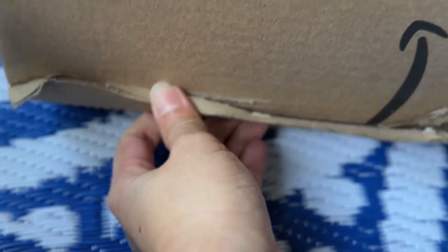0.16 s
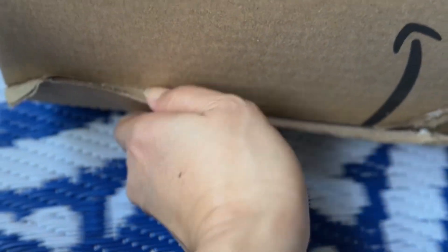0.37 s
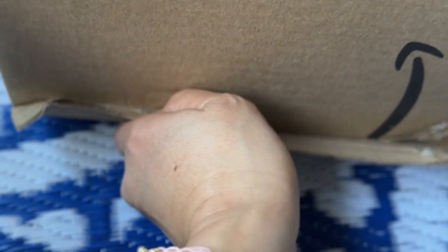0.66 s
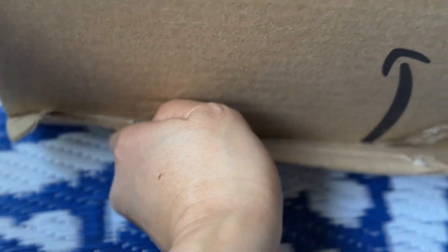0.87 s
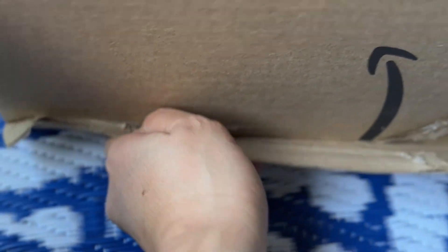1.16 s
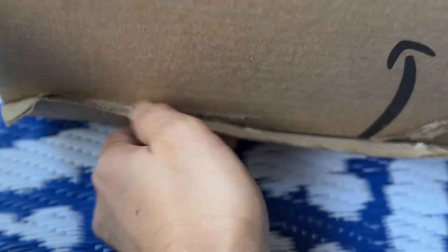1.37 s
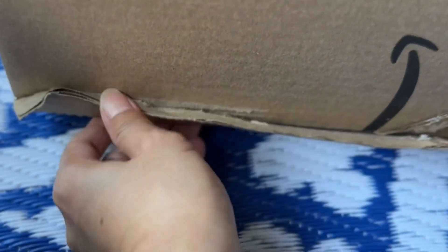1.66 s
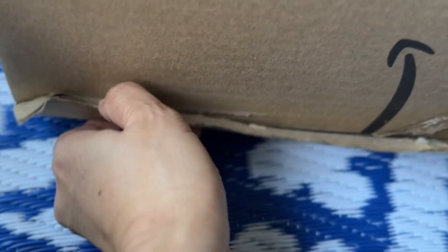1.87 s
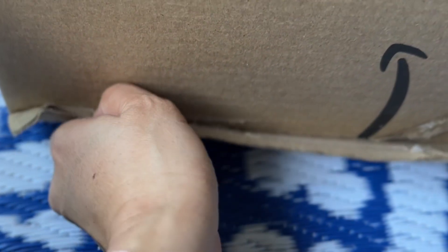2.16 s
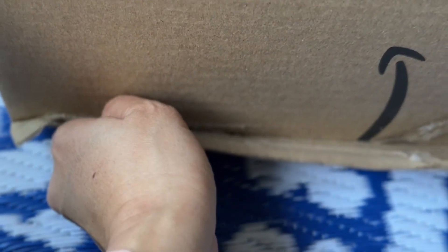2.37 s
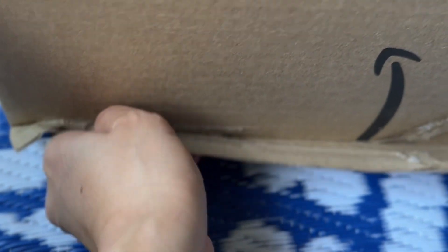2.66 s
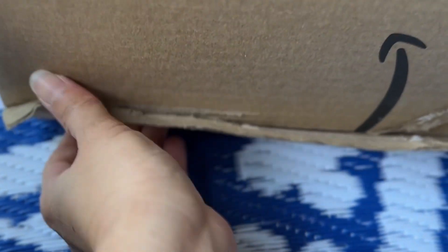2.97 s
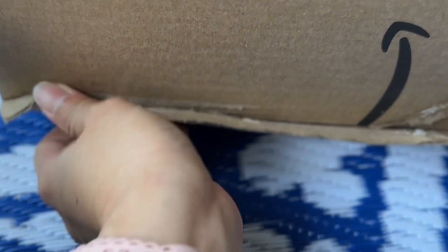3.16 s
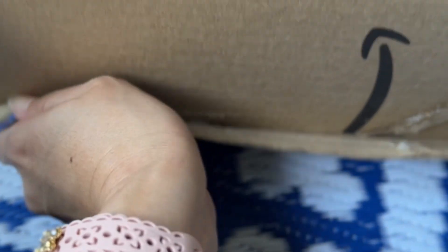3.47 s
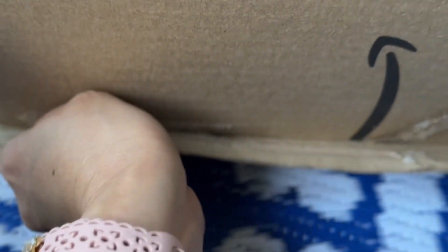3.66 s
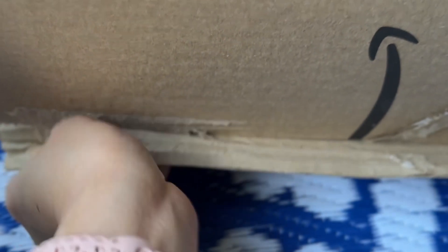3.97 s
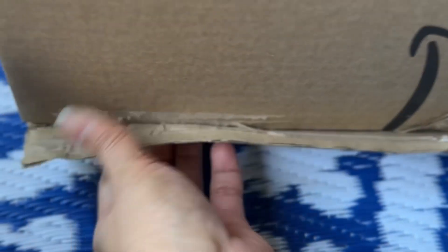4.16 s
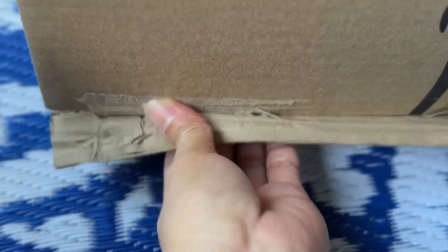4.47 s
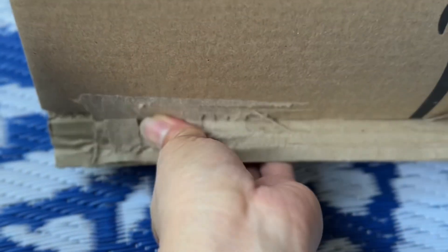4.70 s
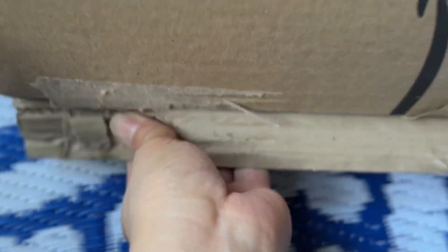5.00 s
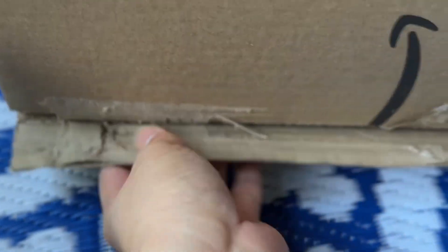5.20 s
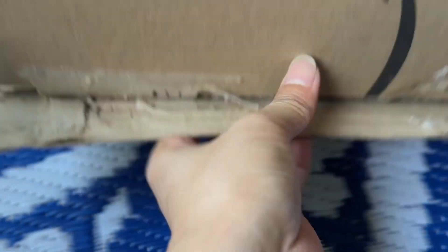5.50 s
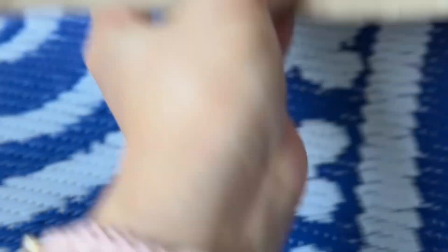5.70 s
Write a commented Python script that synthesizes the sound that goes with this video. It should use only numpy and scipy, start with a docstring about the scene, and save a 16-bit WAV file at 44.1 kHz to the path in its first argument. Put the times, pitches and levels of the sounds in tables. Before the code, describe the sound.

Very close to the microphone in a small room, fingers pick at a cardboard box seam. Soft scratching and dull flap knocks come first, then a hard hollow pop near two seconds. Dry ticks and crackling follow, building to sharp tearing snaps around three and a half and nearly five seconds, then lighter rubbing over faint hiss.

```python
"""Fingers pick at the taped seam of a cardboard box in a small room, close to the microphone.
Tape lets go in sharp snaps and fibres tick: bursts of noise, coloured by the board and the seam.
A nail rasps along the edge: random stick-slip clicks, filtered as hiss or ringing narrow patches.
The flap flexes with hollow knocks and groans: swinging sines. Knocks and rubbing ring the same box modes.
Low shoves of the hand, a hum of the box, a short room tail and a low rumble with faint hiss lie beneath."""
import sys
import numpy as np
from scipy import signal
from scipy.fft import rfft, irfft, next_fast_len
from scipy.io import wavfile

SR = 44100
rng = np.random.default_rng(int(sys.argv[2]) if len(sys.argv) > 2 else 0)


def to_wav(s):
    """Save 16-bit WAV."""
    ch = np.atleast_2d(s).T  # columns
    pcm = np.round(np.clip(ch, -1, 1) * 32767)  # PCM
    wavfile.write(sys.argv[1], SR, pcm.astype(np.int16))


N = 257544

# Flexes of the flap. Each row: start in seconds, level in dB, pitch in Hz before the sag of hard pops,
# boom of the whole box and rattle of the wall, both in dB relative to the level before the trims.
KNOCKS = [(0.127, -30.5, 350, -4, -12), (0.1833, -24, 361, 2, -9.5), (0.2204, -23.5, 340, -29, -11.5),
          (0.2332, -24, 336, -17, -8), (0.245, -38, 340, -10, 2), (0.291, -35.5, 403, 8, 3),
          (0.4401, -19.5, 259, 4, -19), (0.47, -29.5, 340, 7, -34), (0.863, -42, 303, 4, -12),
          (1.207, -28.5, 279, 6, -9.5), (1.263, -26, 303, -10, -11), (1.293, -28.5, 200, 6, -16),
          (1.612, -37, 350, 2, -1), (1.703, -35, 252, 0, -2.5), (1.731, -35, 366, -8, -7),
          (1.8563, -3, 369, -28, -20), (2.259, -19, 318, -2, -19), (2.271, -28, 288, -4, -31),
          (2.694, -33.5, 208, -27, -10), (3.086, -28, 363, -8, -12.5), (3.155, -35.5, 400, 5, -2.5),
          (3.2073, -24, 314, -5, -0.5), (3.225, -25, 337, -19, 0), (3.246, -27.5, 314, -12, 2),
          (3.2705, -25, 335, 3, -8), (3.297, -33, 207, 11, -2.5), (3.366, -44.5, 410, 4, 7.5),
          (3.481, -14.5, 291, -4, -15), (3.494, -23, 260, 0, -27), (3.578, -21.5, 270, -25, -14),
          (3.727, -28, 258, -5, -14), (3.963, -23, 336, 7, -2), (4.189, -29, 210, -6, -26),
          (4.198, -38, 304, -8, -24), (4.306, -35, 236.6, -1, -7), (4.521, -28, 314, -9, -7),
          (4.563, -33, 250, 9, -6), (4.613, -37, 401, 0, -3), (4.757, -13, 370, 5, -11),
          (4.769, -16, 352, 4.5, -10), (4.79, -26, 200, 3, -11), (5.297, -38.5, 400, -8, -18),
          (5.37, -31.5, 435, -26, -11), (5.456, -32, 403, -10, -7), (5.492, -34, 358, -8, -10),
          (5.753, -28.5, 335, -5, -31), (5.829, -26.5, 345, -8, -4)]
# Tape and board snapping. Each row: break in seconds, level in dB, pitch in Hz, t60 in seconds,
# level an octave above the pitch in dB.
SNAPS = [(1.002, -32.5, 955, 0.014, -15), (1.28, -29.5, 940, 0.015, -9), (1.8554, -13, 760, 0.011, -17),
         (3.0876, -30, 700, 0.01, -17), (3.2077, -21, 1070, 0.016, -16), (3.2249, -24, 1090, 0.012, -9),
         (3.245, -18.5, 1080, 0.0087, -13.5), (3.2702, -24.5, 1090, 0.011, -12),
         (3.5757, -4, 1170, 0.016, -6), (3.864, -33, 1470, 0.019, -28), (3.964, -25.5, 1010, 0.019, 8),
         (4.136, -31, 910, 0.021, 3), (4.565, -26, 1050, 0.027, -9), (4.613, -30, 3360, 0.029, -19),
         (4.7577, -3, 2360, 0.013, -11), (5.028, -20, 2830, 0.011, -13), (5.576, -19, 1490, 0.015, -8),
         (5.563, -38, 1800, 0.014, -7), (5.603, -33, 1600, 0.014, -9), (5.616, -31, 1090, 0.021, -1),
         (5.815, -32, 1250, 0.018, -8), (5.83, -29, 1250, 0.022, -8)]
# Strokes of the nail along the seam, sizzling on slick tape and dull on bare board. Each row: start,
# length and rise in seconds, hiss level in dB, lift of the treble in dB.
STROKES = [(0.0, 0.33, 0.022, -44.5, -5), (0.51, 0.045, 0.011, -51.5, 6.5), (0.59, 0.23, 0.02, -45.5, 2.5),
           (0.792, 0.4, 0.075, -41.5, -4.5), (1.164, 0.14, 0.029, -44.5, -15),
           (1.353, 0.092, 0.033, -44, -8), (1.683, 0.026, 0.024, -45, 6), (2.193, 0.12, 0.087, -39, 2.5),
           (2.332, 0.02, 0.0046, -40, 11), (2.36, 0.035, 0.011, -43.5, 7.5), (2.436, 0.13, 0.019, -40, 4),
           (2.686, 0.047, 0.012, -38.5, -1), (2.987, 0.018, 0.015, -43, 2), (3.082, 0.012, .01, -42, -5),
           (3.478, 0.051, .005, -37.5, 0), (3.574, 0.046, 0.0037, -28, 3), (3.652, 0.25, 0.072, -33.5, 3.5),
           (3.951, 0.12, 0.015, -38, -16), (4.202, 0.2, 0.011, -48, 3.5), (4.405, 0.13, 0.054, -40.5, 9),
           (4.497, 0.044, 0.015, -30, 9), (4.562, 0.034, .01, -35.5, 7), (4.612, 0.021, 0.0054, -36.5, 8.5),
           (4.661, 0.047, .005, -40.5, 16), (4.697, 0.064, 0.062, -23.5, 2), (4.78, 0.1, 0.017, -39.5, 7.5),
           (5.289, 0.62, 0.036, -37.5, -2), (5.517, 0.75, 0.034, -39.5, -4)]
# Modes of the box. Each row: frequency in Hz, level in dB, t60 in seconds.
BOX = [(57.7, -7, 0.083), (105, 1.5, 0.048), (136.3, 1, 0.11), (201.6, -5.5, 0.094), (291.7, -5.5, 0.043),
       (348.8, -3.5, 0.048), (478, -7, 0.027), (581, -2.5, 0.03), (984, -4, 0.01), (1122, -4.5, 0.024),
       (1256, -8.5, 0.019), (1770, -8.5, 0.015), (2075, -9.5, 0.017), (2690, -11, 0.0085)]
# Stereo width. Each row: frequency in Hz, side relative to mid in dB.
WIDTH = [(60, -16), (200, -16), (380, -18.5), (650, -1), (1200, -4.5), (2400, 3), (16000, -8)]
TICK_T60_S = 0.01   # neighbouring fibres follow a catch or a crack in a rip for this long


def amp(db):
    """Decibels to gain."""
    return 10 ** (np.asarray(db) / 20)


def rms_one(x):
    """Scale to unit rms."""
    return x / np.sqrt(np.mean(x ** 2) + 1e-20)


def at_hz(points, hz):
    """Read a curve of (Hz, value) points on a log-frequency axis."""
    f, values = np.transpose(points)
    return np.interp(np.log(np.maximum(hz, 1)), np.log(f), values)


def fade(t, t60):
    """Exponential decay, 60 dB down after t60 seconds."""
    return np.exp(-np.log(1000) * t / max(t60, 1e-3))


def add(track, s, sound):
    """Mix a sound in at time s, cut off at the end of the track."""
    i = min(max(round(s * SR), 0), N)
    track[..., i:i + sound.shape[-1]] += sound[..., :N - i]


def colour(x, spectrum):
    """Causal (minimum-phase) filter with the given spectrum, folded from its real cepstrum."""
    size = 2 * next_fast_len(x.shape[-1] // 2 + 2048)
    gains = amp(at_hz(spectrum, np.fft.rfftfreq(size, 1 / SR)))
    cepstrum = irfft(np.log(gains))
    cepstrum[1:size // 2] *= 2
    cepstrum[size // 2 + 1:] = 0
    response = np.exp(rfft(cepstrum))
    return irfft(rfft(x, size) * response)[..., :x.shape[-1]]


def drift(rate):
    """Smooth chance: straight lines between normal random knots, rate knots per second."""
    knots = rng.standard_normal(N // 40)
    return np.interp(np.arange(N) / SR * rate, np.arange(len(knots)), knots)


def fracture(t, lead_s, build_db, build_t60):
    """Fibres give way faster and faster until the break at lead_s."""
    return (t < lead_s) * amp(build_db) * fade(np.abs(lead_s - t), build_t60)


def effort(length_s, rise_s, ease_db_per_s, release_t60):
    """Pressure builds, eases off slowly while the movement lasts, then dies away."""
    t = np.arange(SR) / SR
    rise = np.minimum(t / max(rise_s, 1e-3), 1)
    return rise * amp(-ease_db_per_s * t) * fade(np.maximum(t - length_s, 0), release_t60)


def delayed(x, count):
    """Later by count samples."""
    return np.pad(x, (count, 0))[:len(x)]


def left_right(mid, side):
    """Mid and side to two channels."""
    return np.array([mid + side, mid - side])


def diffuse(size):
    """Noise from all round: nearly alike left and right in the bass, less so in the treble."""
    mid, side = rng.standard_normal((2, size))
    return left_right(mid, colour(side, WIDTH))


def from_seam(mid, side, bounce=0.013):
    """Sound from the seam bounces once in the gap under the flap and reaches the left port a little later."""
    # Each row: frequency in Hz, side relative to mid in dB.
    seam_width = [(2000, -4), (4500, 0.5), (8000, -5.5), (16000, -54)]
    # Each row: frequency in Hz, left minus right in dB.
    seam_balance = [(2200, 0), (4000, -2.5), (6000, 4), (9000, -0.5), (16000, 2)]
    # Each row: frequency in Hz, lag of the left port in radians.
    port_phase = [(400, 0), (3700, 3.1), (7000, 4.9), (8000, 6.3), (8700, 6.4), (10400, 9.35), (11900, 9.5),
                  (13700, 12.5), (15000, 12.6), (16000, 14)]
    bounce_s = 0.001
    channels = left_right(mid, colour(side, seam_width))
    left, right = (x - bounce * delayed(x, round(bounce_s * SR)) for x in channels)
    size = 2 * next_fast_len(N // 2 + 2048)
    lag = at_hz(port_phase, np.fft.rfftfreq(size, 1 / SR))
    left = irfft(rfft(left, size) * np.exp(-1j * lag))[:N]
    left = colour(left, [(hz, db / 2) for hz, db in seam_balance])
    right = colour(right, [(hz, -db / 2) for hz, db in seam_balance])
    return np.array([left, right])


def slips(per_s, spread_db, clump_db, clump_rate):
    """Stick-slip: two rows of random clicks of uneven size that come in clumps."""
    born = rng.random((2, N)) < per_s / SR
    sizes = amp(spread_db * np.clip(rng.standard_normal((2, N)), -2, 2))
    signs = rng.choice([-1, 1], (2, N))
    clumps = amp(clump_db * np.clip(drift(clump_rate), -2, 2))
    return rms_one(born * sizes * signs * clumps)


def sliding_ring(drive, hz, t60):
    """A resonance whose pitch wanders as the finger moves and bends the board."""
    detune, detunes_per_s = 0.03, 14
    pitch = hz * (1 + detune * drift(detunes_per_s)[:drive.shape[-1]])
    turn = np.exp(2j * np.pi * np.cumsum(pitch) / SR)
    # shift the drive down to 0 Hz, let it decay there, shift it back up
    # the tiny offset keeps the filter off exact zero
    ring = signal.lfilter([1], [1, -fade(1 / SR, t60)], drive * np.conj(turn) + 1e-18)
    return np.imag(turn * ring)


def background(level_db=-53.0):
    """Low rumble of the room under a faint steady hiss: coloured noise."""
    # Each row: frequency in Hz, gain in dB.
    air = [(20, -2.5), (60, 10), (130, -6.5), (250, 1.5), (500, -13.5), (1000, -16.5), (2300, -23.5),
           (3300, -6.5), (4500, -7), (7000, -14.5), (10000, -63), (16000, -69)]
    return amp(level_db) * rms_one(colour(diffuse(N), air))


def room(x, t60=0.2, wet_db=-18.5, first_s=0.0066):
    """A short, soft tail from the walls: the sound convolved with decaying noise."""
    t = np.arange(SR // 2) / SR
    tail = diffuse(len(t)) * fade(t, t60) * (t > first_s)
    tail = tail / np.sqrt(np.sum(tail ** 2) / 2)
    tail = colour(tail, [(400, 6.5), (1500, 7.0), (8000, 2.0)])
    return amp(wet_db) * signal.fftconvolve(x, tail, axes=-1)[:, :N]


def box_drive():
    """Strength of sway, drone and rasp: the hand rests and drags, and every knock or snap leaves a shudder."""
    # Drags of the hand, and a brief shudder of the box after a knock. Each row: start, length and rise
    # in seconds, then sway of the box, drone of the flap and rasp of the wall, each in dB.
    drags_and_shudder = [(0.0, 0.29, 0.005, -54, -51, -58), (0.18, 0.17, 0.087, -49, -46.5, -55),
                         (0.436, 0.015, 0.0051, -31, -34, -49), (0.847, 0.48, 0.017, -68, -48, -60.5),
                         (0.983, 0.11, 0.068, -41, -48, -50), (1.244, 0.054, .018, -32, -36.5, -44.5),
                         (1.343, 0.098, 0.013, -45, -43.5, -53), (1.569, 0.049, 0.02, -46.5, -46, -52),
                         (1.668, 0.05, 0.015, -41.5, -35.5, -51), (2.283, 0.11, .02, -68, -55.5, -59),
                         (2.455, 0.1, 0.023, -72, -60, -65.5), (2.673, 0.16, 0.021, -48, -47.5, -52.5),
                         (2.944, 0.06, 0.058, -55, -53.5, -54), (3.08, 0.032, 0.0063, -37.5, -42, -57.5),
                         (3.197, 0.056, 0.01, -41, -41, -64), (3.477, 0.013, 0.0094, -33, -33, -48),
                         (3.679, 0.38, 0.036, -44.5, -40.5, -49.5), (3.935, 0.23, .01, -43.5, -53, -55.5),
                         (4.183, 0.27, 0.0096, -46.5, -47.5, -56.5), (4.386, 0.14, 0.057, -54, -51, -52),
                         (4.499, 0.076, 0.017, -43, -46.5, -46.5), (4.601, 0.036, 0.0092, -40, -51, -52),
                         (4.661, 0.14, .01, -42, -41, -47.5), (4.734, 0.15, .01, -39, -36, -44),
                         (4.876, 0.31, .02, -43.5, -65, -58), (5.291, 0.36, .008, -42.5, -41.5, -49.5),
                         (5.636, 0.12, 0.033, -47, -47, -49.5), (5.75, 0.22, 0.12, -30, -30.5, -41.5)]
    # Sway, drone and rasp in dB under the resting hand.
    resting_db = (-52.5, -59, -70.5)
    # Sway, drone and rasp in dB relative to the knock or snap that sets the box shuddering.
    knock_shudder_db = (-22.5, -23.5, -62)
    snap_shudder_db = (-26.5, -23.5, -30.5)
    ease_db_per_s, release_t60_s = 10, 0.17
    shudder_rise_s, shudder_t60_s = 0.0026, 0.2
    power = np.outer(amp(resting_db) ** 2, np.ones(N))
    for s, length_s, rise_s, *db in drags_and_shudder:
        shape = effort(length_s, rise_s, ease_db_per_s, release_t60_s)
        add(power, s, np.outer(amp(db), shape) ** 2)
    shudder = effort(shudder_rise_s, shudder_rise_s, 0, shudder_t60_s)
    for blows, shudder_db in (KNOCKS, knock_shudder_db), (SNAPS, snap_shudder_db):
        for s, db, *_ in blows:
            add(power, s, np.outer(amp(db) * amp(shudder_db), shudder) ** 2)
    return np.sqrt(power)


def box_rubbing(sway_db=-3.0, drone_db=-0.5, rasp_db=0.0):
    """Skin drags smoothly and rings the low modes; the nail catches on the flutes and rattles the high ones."""
    patchy_db, patches_per_s = 2.5, 22   # each mode swells and fades as the hand finds new spots
    sway, drone, rasp = box_drive() * amp([sway_db, drone_db, rasp_db])[:, None]
    skin = slips(per_s=2500, spread_db=2.0, clump_db=0.44, clump_rate=100)
    nail = slips(per_s=770, spread_db=0.0, clump_db=2.5, clump_rate=130)
    out = np.zeros((2, N))
    for hz, mode_db, t60 in BOX:
        if hz < 180:
            level, (mid, side) = sway, skin
        elif hz < 550:
            level, (mid, side) = drone, skin
        else:
            level, (mid, side) = rasp, nail
        drive = left_right(mid, side * amp(at_hz(WIDTH, hz)))
        patches = amp(mode_db + patchy_db * drift(patches_per_s))
        # subtracting the sum so far sets neighbouring modes in opposite senses
        out = level * patches * rms_one(sliding_ring(drive, hz, t60)) - out
    return out


def groans_and_shoves():
    """Low sines of sliding, unsteady pitch and level: groans of the flap, shoves of the hand, a hum of the box."""
    # The pressed flap groans with a sliding pitch; the lowest rows are shoves of the hand and a hum of the
    # whole box. Each row: start, length and rise in seconds, level in dB, first and last pitch in Hz.
    groan_rows = [(0.13, 0.019, 0.0046, -34, 365, 347), (0.245, 0.032, .005, -40, 346, 358),
                  (0.316, 0.036, 0.0074, -44.5, 400, 253), (1.298, 0.047, 0.013, -39, 62, 50),
                  (1.574, 0.056, 0.023, -38.5, 322, 361), (1.636, 0.046, .005, -42, 340, 313),
                  (1.674, 0.029, 0.0048, -29, 342, 325), (1.711, 0.037, .008, -42, 292, 427),
                  (1.764, 0.0081, .004, -40.5, 310, 310), (3.213, 0.1, 0.0067, -35, 118.3, 105),
                  (4.769, 0.05, .01, -32, 56, 46), (4.775, 0.034, 0.0062, -29.5, 165, 218),
                  (4.812, .025, 0.0069, -29.5, 400, 344), (4.843, 0.0304, .008, -37.5, 402, 360),
                  (4.874, 0.017, 0.0046, -29.5, 345, 375), (5.321, 0.025, .015, -32, 121, 85.5),
                  (5.783, 0.054, 0.056, -32, 319, 341)]
    pitch_wander, wobble_db, wobbles_per_s, release_t60_s = 0.11, 4.5, 210, 0.034
    out, t = np.zeros(N), np.arange(SR // 2) / SR
    for s, length_s, rise_s, db, first_hz, last_hz in groan_rows:
        wander, wobble = (drift(wobbles_per_s)[:len(t)] for _ in range(2))
        pitch = np.interp(t, [0, length_s], [first_hz, last_hz]) * (1 + pitch_wander * wander)
        swing = rms_one(amp(wobble_db * wobble) * np.sin(2 * np.pi * np.cumsum(pitch) / SR))
        add(out, s, amp(db) * effort(length_s, rise_s, 0, release_t60_s)[:len(t)] * swing)
    return out


def flexes(rise_s=0.0047, crush=0.44, sag=0.0041, level_db=0.0):
    """The flap pops over in a few cycles; hard pops crush the flutes, so they sound lower and die sooner."""
    gentle_db, gentle_t60_s = -27.5, 0.045   # a gentle flex and its ring
    out, t = np.zeros(N), np.arange(SR // 4) / SR
    for s, db, hz, _, _ in KNOCKS:
        force = db - gentle_db
        swell = np.sin(np.pi / 2 * np.minimum(t / rise_s, 1)) ** 2
        decay = fade(np.maximum(t - rise_s, 0), gentle_t60_s * amp(-crush * force))
        pitch = hz * (1 - sag * max(force, 0))
        add(out, s, amp(db + level_db) * swell * decay * np.sin(2 * np.pi * pitch * t))
    return out


def bumps(count=24):
    """The dragged nail drops into one flute after another at an uneven pace: (s, dB, boom dB, rattle dB)."""
    # Runs of small jolts. Each row: start and length in seconds, level in dB.
    runs = [(1.019, .13, -40), (3.701, 0.18, -38), (4.512, .06, -39), (4.665, .08, -33), (5.297, .33, -33),
            (5.79, .05, -31)]
    per_s, spread_db = 45, 3.5
    boom_db, wall_db = -11, -11   # relative to the jolt
    rows = []
    for s, length_s, db in runs:
        gaps = rng.uniform(.3, 1.7, count) / per_s
        delays = np.cumsum(gaps) - gaps[0]
        sizes = db + spread_db * np.clip(rng.standard_normal(count), -2, 1)
        for delay, size in zip(delays, sizes):
            if delay < length_s:
                rows.append((s + delay, size, boom_db, wall_db))
    return rows


def box_knocks(boom_db=-5.0, flap_db=-3.5, wall_db=10.0, top_db=-5.0):
    """Every flex and jolt strikes the modes of the box, each with a strength and tuning of its own."""
    # The grip retunes the wall. Each row: time in seconds, pitch ratio.
    wall_tuning = [(0.24, 1.07), (0.29, 1.06), (3.2, 0.98)]
    detune_spread = 0.018
    out, t = np.zeros((2, N)), np.arange(SR // 8) / SR
    hz, mode_db, t60 = np.transpose(BOX)
    # neighbouring modes swing in opposite senses
    senses = (-1) ** np.arange(len(hz))[:, None]
    decays = np.array([fade(t, each) for each in t60]) * senses
    chance = rng.standard_normal((N // 1000, 3, len(hz)))
    blows = [(s, db, boom, wall) for s, db, _, boom, wall in KNOCKS] + bumps()
    for (s, db, boom, wall), (strength, lean, detune) in zip(blows, chance):
        push = at_hz([(120, boom + boom_db), (330, flap_db), (1100, wall + wall_db), (2200, wall + top_db)], hz)
        grip = np.where(hz > 800, np.interp(s, *np.transpose(wall_tuning)), 1)
        pitches = hz * grip * (1 + detune_spread * detune)
        modes = decays * np.sin(2 * np.pi * np.outer(pitches, t))
        pan = left_right(0.54, lean * amp(at_hz(WIDTH, hz)) / 2)
        gains = amp(db + mode_db + push + 2 * strength) * pan
        add(out, s + 0.002237, gains @ modes)   # the modes answer a little after the flex starts
    return out


def nail_drive():
    """Strength of the hiss and of its treble, stroke by stroke, over fingers that creep between strokes."""
    resting_hiss_db, resting_lift_db = -51.5, -0.5
    ease_db_per_s, release_t60_s = 8, 0.15   # the nail eases off as it slides, then lifts
    waver_db, waver_per_s = 2.5, 25   # the nail never presses quite evenly
    power = np.zeros((2, N))
    for s, length_s, rise_s, db, lift_db in STROKES:
        shape = effort(length_s, rise_s, ease_db_per_s, release_t60_s)
        add(power, s, np.outer(amp([db, db + lift_db]), shape) ** 2)
    resting = amp([[resting_hiss_db], [resting_hiss_db + resting_lift_db]])
    return np.sqrt(power + resting ** 2) * amp(waver_db * drift(waver_per_s))


def scratching(level_db=-1.0, grit_db=-10.0, sizzle_hz=9000):
    """The nail plucks thousands of fine paper fibres a second, and now and then cracks a coarse one."""
    # Colour of the fibres. Each row: frequency in Hz, gain in dB.
    fibre_colour = [(600, -39), (2000, -10), (2800, -0.5), (3600, 0.5), (5600, -0.5), (7300, 3.5),
                    (8400, 2.5), (9600, 3.5), (12000, 2), (16000, 8.5)]
    hiss, sizzle = nail_drive()
    fine = slips(per_s=8000, spread_db=6.5, clump_db=2.5, clump_rate=120)
    coarse = slips(per_s=160, spread_db=3.5, clump_db=1.5, clump_rate=40)
    t = np.arange(SR // 200) / SR
    # a coarse fibre splinters for a few milliseconds
    splinter = rng.standard_normal((2, len(t))) * fade(t, 0.0052)
    grit = rms_one(signal.fftconvolve(coarse, splinter, axes=-1)[:, :N])
    plucks = fine + amp(grit_db) * grit
    fibres = rms_one(colour(from_seam(*plucks), fibre_colour))
    # hiss below sizzle_hz and sizzle above it follow the nail separately
    board = signal.sosfilt(signal.butter(1, sizzle_hz, fs=SR, output="sos"), fibres)
    return amp(level_db) * (hiss * board + sizzle * (fibres - board))


def rasps(side_db=-9.0):
    """The nail chatters on one narrow patch of tape or board: clumps of tiny slips ring the patch under it."""
    # Each row: start, length and rise in seconds, level in dB, resonance and width in Hz.
    rasp_rows = [(3.715, 0.019, 0.01, -41.5, 1270, 87), (3.715, 0.036, .012, -40, 5100, 500),
                 (3.712, 0.05, 0.011, -41.5, 7250, 190), (4.509, 0.024, 0.011, -36.5, 3900, 280),
                 (4.507, 0.032, 0.011, -43, 1000, 210), (5.295, 0.214, 0.0074, -50, 993, 93),
                 (5.41, 0.13, 0.015, -50, 1860, 230), (6, .2, 0.073, -52, 4300, 250),
                 (5.48, 0.096, 0.018, -47, 5000, 200), (5.755, .09, 0.04, -44.5, 2550, 210)]
    release_t60_s = 0.039
    out = np.zeros((2, N))
    chatter = slips(per_s=380, spread_db=3.5, clump_db=4.0, clump_rate=120)
    for s, length_s, rise_s, db, hz, width_hz in rasp_rows:
        drive = np.roll(chatter, -round(s * SR), axis=-1)[:, :SR]
        ring_t60 = np.log(1000) / (np.pi * width_hz)
        mid, side = rms_one(sliding_ring(drive, hz, ring_t60))
        shape = effort(length_s, rise_s, 0, release_t60_s)
        add(out, s, amp(db) * shape * left_right(mid, amp(side_db) * side))
    return out


def catches(count=12):
    """The nail catches at random moments of each stroke, harder in the strong ones: rows as for ticks."""
    per_s, catch_db, spread_db = 12, 3.5, 0.5   # catch_db is relative to the hiss of the stroke
    rows = []
    for s, length_s, _, db, lift_db in STROKES:
        delays = np.cumsum(rng.exponential(1, count)) / per_s
        sizes = db + catch_db - spread_db * rng.standard_normal(count)
        for delay, size in zip(delays, sizes):
            if delay < length_s:
                rows.append((s + delay, size, lift_db, TICK_T60_S))
    return rows


def rips(count=24):
    """The paper rips in a quick, uneven run: one bundle of fibres after another gives way, rows as for ticks."""
    # Each row: start and length in seconds, level in dB, lift of the treble in dB.
    rip_rows = [(3.589, .048, -25.5, -2), (3.697, .055, -24, -3), (3.753, .135, -26, -1),
                (4.507, .042, -25, -4), (4.672, .075, -31, -3), (4.771, .04, -22, -12),
                (5.431, .19, -30.5, -11), (5.814, .026, -27.5, 0)]
    cracks_per_s, spread_db = 105, 4
    rows = []
    for s, length_s, db, lift_db in rip_rows:
        gaps = rng.uniform(.35, 1.65, count) / cracks_per_s
        delays = np.cumsum(gaps) - gaps[0]
        sizes = db + spread_db * np.clip(rng.standard_normal(count), -2, 1)
        for delay, size in zip(delays, sizes):
            if delay < length_s:
                rows.append((s + delay, size, lift_db, TICK_T60_S))
    return rows


def ticks(level_db=3.0, crack_t60=0.0034, after_db=2.5, build_db=-9.5, build_t60=0.034, top_hz=10500):
    """A bundle of fibres strains, breaks at once, and its neighbours follow."""
    # Bundles cracking under the nail, tape brighter than paper. Each row: break in seconds,
    # level in dB before the trim, lift of the treble in dB, t60 in seconds of the fibres that follow.
    tick_rows = [(0.303, -43, 7, .016), (0.438, -28.5, 3.5, .016), (0.4643, -30.5, 7, 0.018),
                 (0.5317, -37, 7, .016), (0.7248, -29, 3.5, 0.017), (0.862, -19, -1, 0.013),
                 (1, -26.5, 0, 0.014), (1.2005, -21, -2, 0.024), (1.209, -21.5, -1, 0.021),
                 (1.2638, -21.5, -5, .02), (1.272, -31, -4, .016), (1.6129, -20, -13, 0.024),
                 (1.7308, -32.5, 7, 0.0092), (1.856, -31, 11, .012), (2.1046, -38.5, 17.5, .012),
                 (2.242, -31, 5, .005), (2.2606, -21.5, -3, .016), (2.2918, -18, 3.5, 0.0066),
                 (2.3402, -24, 2.5, .016), (2.467, -27, 5.5, 0.015), (2.551, -30.5, 6, .01),
                 (2.5965, -35, 8, .005), (2.6983, -24.5, 6, 0.017), (3.207, -20.5, -16, .008),
                 (3.2238, -21, -13, .007), (3.245, -15.5, -11, 0.0038), (3.2693, -24, -8, .006),
                 (3.3, -34, -11, .008), (3.362, -32, -1, .008), (3.412, -30, -5, 0.011),
                 (3.48, -23.5, -2, 0.019), (3.575, -18, 5, 0.009), (3.727, -25, 2, 0.016),
                 (3.734, -16, 0, 0.013), (3.963, -30, 2, .006), (4.0262, -22.5, 2, 0.0082),
                 (4.512, -21, 1, 0.025), (4.526, -17.5, 2, 0.018), (4.5527, -16.5, 6, 0.0076),
                 (4.5615, -22, 7, .008), (4.6118, -15.5, -13, 0.013), (4.648, -30, 3, .005),
                 (4.6618, -18.5, 3, 0.0065), (4.748, -18, 0, 0.011), (4.7586, -8.5, -3, .018),
                 (4.771, -18, -7, .018), (4.9003, -22.5, 1, .009), (4.9075, -18, -2, 0.0086),
                 (5.0292, -18, -1.5, 0.019), (5.576, -23, -2, .012)]
    # Colour of the cracks. Each row: frequency in Hz, gain in dB.
    crackle = [(400, -12), (1500, -17.5), (3000, -19.5), (5000, -17.5), (8500, -13.5), (16000, -7.5)]
    strength, t = np.zeros((2, N)), np.arange(SR // 10) / SR
    lead_s = .01   # straining before the break
    since = np.maximum(t - lead_s, 0)
    for s, db, lift_db, t60 in tick_rows + catches() + rips():
        crack = (t >= lead_s) * (fade(since, crack_t60) + amp(after_db) * fade(since, t60))
        shape = crack + fracture(t, lead_s, build_db, build_t60)
        add(strength, s - lead_s, np.outer(amp([db, db + lift_db]), shape))
    tearing = np.zeros((2, N))
    for kind, part in zip(("low", "high"), strength):
        band = signal.butter(4, top_hz, kind, fs=SR, output="sos")
        tearing += signal.sosfilt(band, part * rng.standard_normal((2, N)))
    return amp(level_db) * colour(from_seam(*tearing), crackle)


def snaps(level_db=0.0, side_db=-2.5, low_db=-10.5, high_db=0.0, top_db=-27.0, build_db=-25.5, build_t60=0.046):
    """Taut tape breaks free: a burst of tearing, coloured by the patch of board that it held."""
    # Peaks and notches of the corrugated board, heard in every snap. Each row: frequency in Hz, gain in dB.
    board = [(850, 0), (1130, 6), (1480, -5.5), (1900, 0.5), (2620, 3.5), (3080, -6.5), (3750, 2),
             (4650, -0.5), (5700, -5), (7400, 3)]
    out, t = np.zeros((2, N)), np.arange(SR // 10) / SR
    lead_s = .01   # straining before the break
    for s, db, hz, t60, octave_db in SNAPS:
        patch = [(hz / 10, -24), (hz / 2, low_db), (hz, 0), (hz * 2, octave_db),
                 (hz * 4, high_db + 1.26 * octave_db), (16000, top_db + 1.76 * octave_db)]
        burst = (t >= lead_s) * fade(np.abs(t - lead_s), t60)
        shape = burst + fracture(t, lead_s, build_db, build_t60)
        tearing = colour(colour(rng.standard_normal((2, len(t))) * shape, patch), board)
        # each burst follows the energy of its envelope; halved, as peaks stand about twice as high as the rms
        mid, side = (rms_one(x) * np.sqrt(np.mean(shape ** 2)) / 2 for x in tearing)
        add(out, s - lead_s, amp(db + level_db) * left_right(mid, amp(side_db) * side))
    return out


def scene():
    """The box, its room and the background."""
    box = flexes() + groans_and_shoves() + box_knocks() + box_rubbing()
    box = box + scratching() + rasps() + ticks() + snaps()
    return box + room(box) + background()


def record(dry):
    """The microphone loses the deep bass; the loudest peaks are rounded and the top is cut."""
    # Each row: frequency in Hz, gain in dB.
    microphone = [(20, -26), (45, 3), (9500, 1), (11000, 3.5), (13000, 1.5), (15800, -2)]
    cutoff_hz = 15750
    sound = colour(dry, microphone)
    sound = sound / (1 + (sound / .8) ** 6) ** (1 / 6)   # stays within 0.8
    return signal.sosfilt(signal.ellip(10, .1, 80, cutoff_hz, fs=SR, output="sos"), sound)


dry = scene()
out = record(dry)
to_wav(out)
```